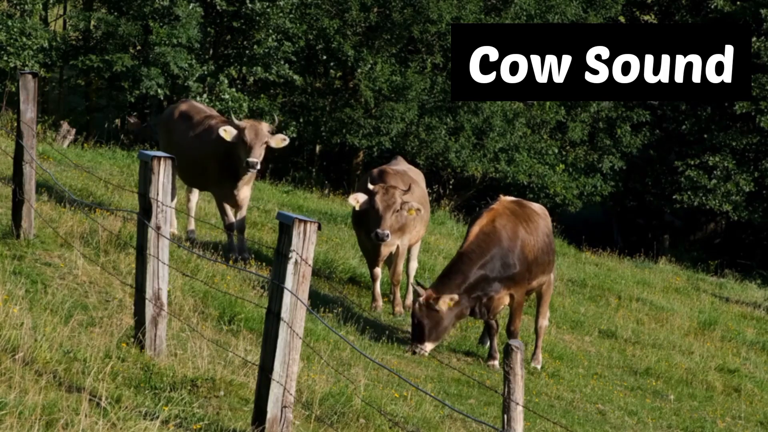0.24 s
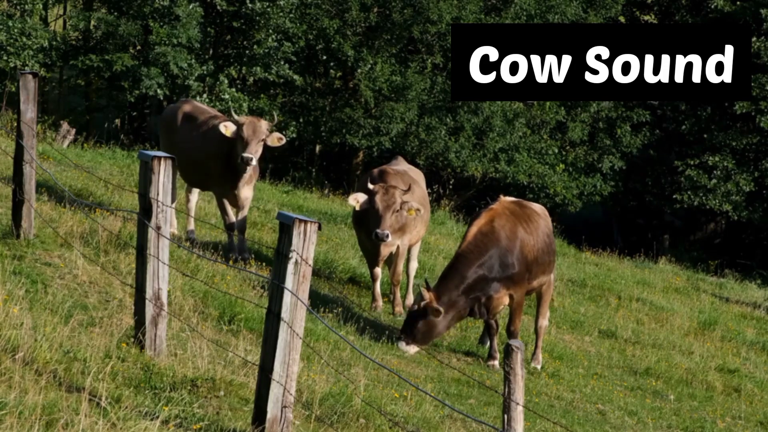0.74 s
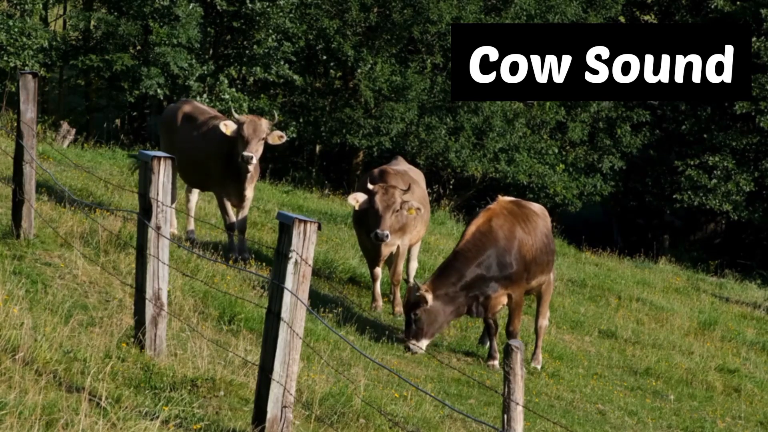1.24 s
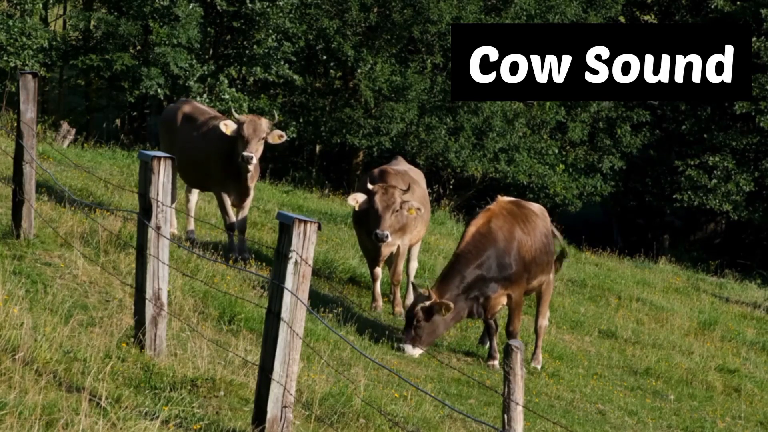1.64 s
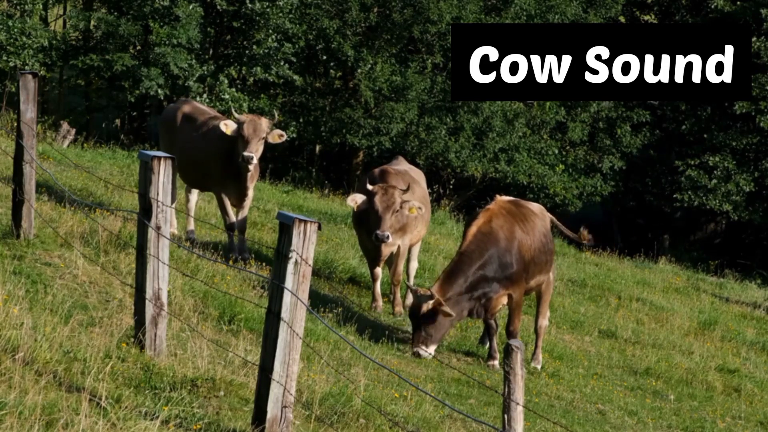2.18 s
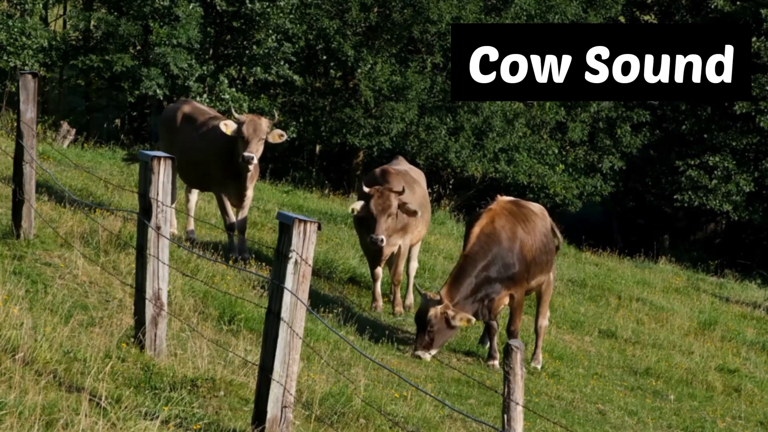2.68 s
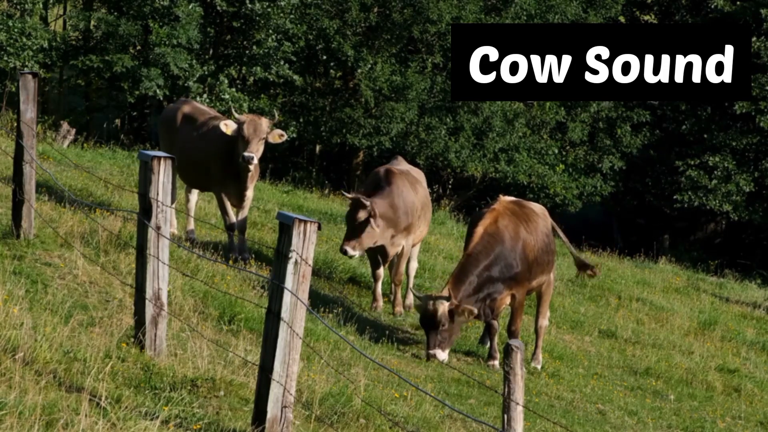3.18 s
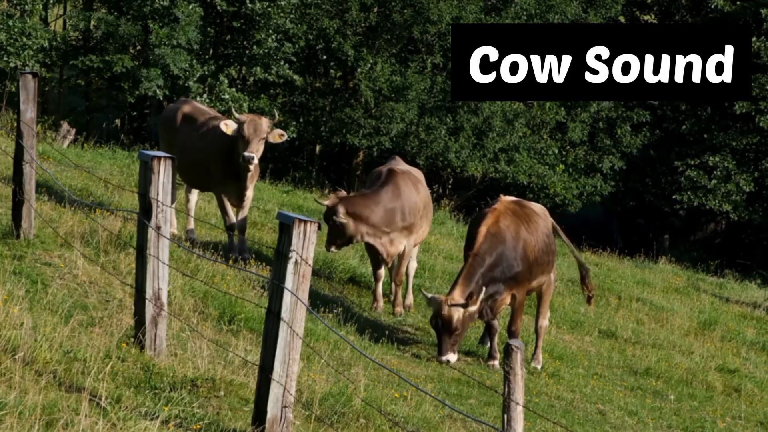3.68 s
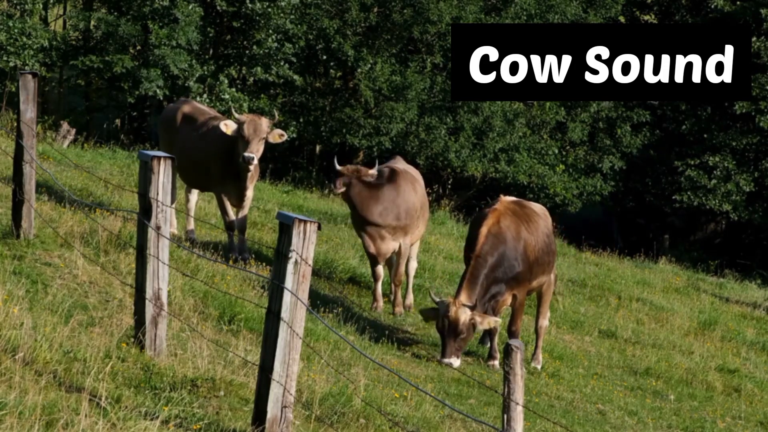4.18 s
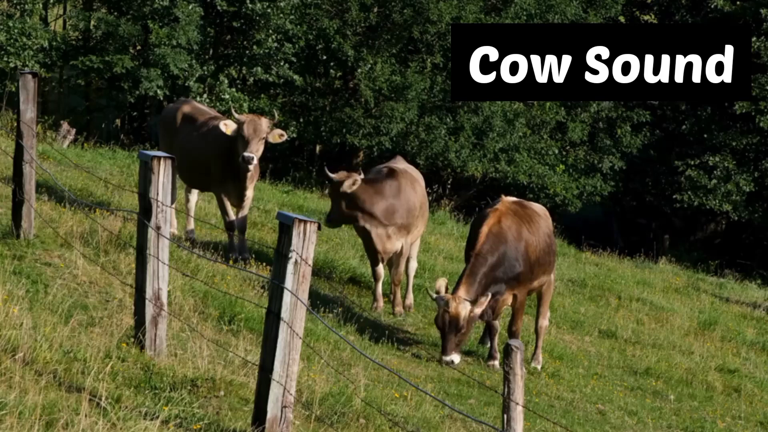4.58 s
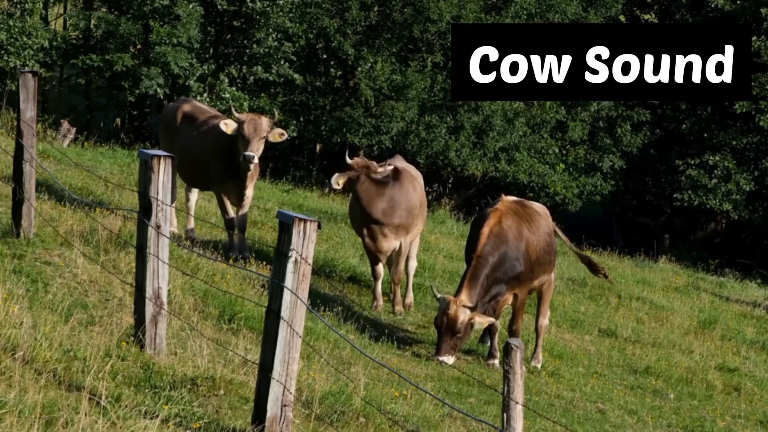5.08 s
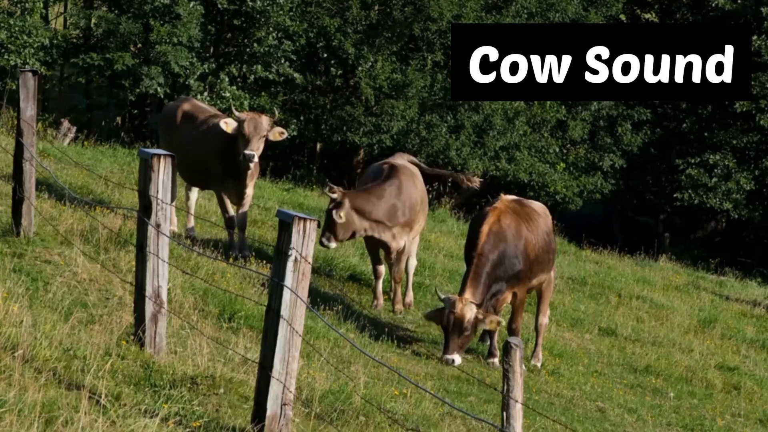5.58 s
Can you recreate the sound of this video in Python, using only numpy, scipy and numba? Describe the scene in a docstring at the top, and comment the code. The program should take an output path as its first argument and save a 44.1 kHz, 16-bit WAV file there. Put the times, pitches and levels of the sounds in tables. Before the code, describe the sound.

Small birds chirp in quiet open air, then a cow's low rattle climbs into a long, held moo.

```python
"""Cow mooing on a pasture

Small birds chirp over a rush of open air and soft rustles of grass; a wood echoes them.
A cow gives one long moo, a low rattle that climbs into a clear, held bellow: vocal fold pulses
ring the moving resonances of throat, mouth and head. All sound cuts out briefly as the moo
ends, then a faint falling tone follows far off."""
import sys
import numpy as np
from scipy import signal
from scipy.fft import rfft, irfft, next_fast_len
from scipy.io import wavfile
from scipy.ndimage import uniform_filter1d
from numba import njit

SR = 44100
rng = np.random.default_rng(int(sys.argv[2]) if len(sys.argv) > 2 else 0)


def unload_wav(signal):
    """Save mono or channel-first audio to the path in sys.argv[1] as 16-bit WAV at rate SR, clipped to [-1, 1]."""
    wavfile.write(
        sys.argv[1],
        SR,
        np.round(np.clip(np.atleast_2d(signal).T, -1, 1) * 32767).astype(np.int16),
    )


N = 257103
TIME = np.arange(N) / SR


def undb(db):
    """Decibels to gain."""
    return 10 ** (np.asarray(db) / 20)


def ramp(x, start, span):
    """0 before start, rising straight to 1 over span."""
    return np.clip((x - start) / span, 0, 1)


def curves(table):
    """Each value column of a table of (seconds, value, ..), one value per sample."""
    times_s, *columns = np.transpose(table)
    return [np.interp(TIME, times_s, column) for column in columns]


def delayed(x, seconds):
    """Delay by a fixed or moving time."""
    return np.interp(TIME - seconds, TIME, x, left=0)


def smooth(x, samples):
    """Moving average, applied twice."""
    return uniform_filter1d(uniform_filter1d(x, samples), samples)


def unit(x):
    """Scale to rms 1."""
    return x / np.sqrt(np.mean(x ** 2))


def steady(x):
    """Hold the short-term rms at 1."""
    return x / np.sqrt(np.abs(smooth(x ** 2, samples=1300)) + 1e-14)


def wander(rate_hz):
    """Smoothed random steps, spread near 1."""
    hold = int(SR / rate_hz)
    steps = np.repeat(rng.standard_normal(N // hold + 1), hold)
    return 1.43 * smooth(steps, hold)[:N]


def butter(x, hz, kind, order):
    """Butterworth low-pass or high-pass."""
    return signal.sosfilt(signal.butter(order, hz, kind, fs=SR, output="sos"), x)


@njit
def svf(x, hz, width_hz):
    """State-variable filter with a moving centre: band-pass and resonant low-pass outputs."""
    out = np.empty((2, len(x)))
    band_state, low_state = 0., 0.
    for i in range(len(x)):
        g, damping = np.tan(np.pi * hz[i] / SR), width_hz / hz[i]
        band = (band_state + g * (x[i] - low_state)) / (1 + g * (g + damping))
        out[0, i], out[1, i] = damping * band, low_state + g * band
        band_state, low_state = 2 * band - band_state, low_state + 2 * g * band
    return out


def resonance(x, hz, width_hz):
    """Band-pass with gain 1 at its centre."""
    return svf(x, hz * np.ones(N), float(width_hz))[0]


def steep_resonance(x, hz, width_hz, narrowing=1):
    """Two band-passes in series; narrowing scales the second width."""
    return resonance(resonance(x, hz, width_hz), hz, narrowing * width_hz)


def cavity(x, hz, width_hz):
    """Tube resonance: passes what lies below, damps what lies above."""
    return svf(x, hz * np.ones(N), float(width_hz))[1]


# Each row: frequency in Hz, relative noise density in dB.
AIR_SPECTRUM = [(24, -88), (40, -63.5), (105, -17.5), (156, -8.5), (193, -3.5), (372, -4), (428, 0),
                (530, -5), (578, -16), (630, -8), (718, -4), (788, -12.5), (1560, -18), (2210, -20),
                (2740, -25), (7330, -45.5), (10900, -45.5), (14200, -103.5), (22000, -120)]
# Each row: time in seconds, overall level in dB.
AIR_LEVEL = [(0, -37), (.4, -37.5), (1.05, -42), (1.25, -39.5), (2.2, -40.5), (3.2, -39.5), (5.83, -44)]
# Each row: time in seconds, midrange lift in dB, treble lift in dB.
LEAF_HISS = [(0, -3.5, 4.5), (.45, -3.5, 6.5), (.7, -3.5, 5), (1.3, 0.5, 11.5), (2.2, -0.5, 6),
             (2.8, -1.5, 15.5), (5.83, 5.5, 15)]


def air():
    """Outdoor rush in wavering third-octave bands; the leaf hiss comes and goes."""
    (level_db,), (mid_db, treble_db) = curves(AIR_LEVEL), curves(LEAF_HISS)
    points_hz, points_db = np.transpose(AIR_SPECTRUM)
    size = next_fast_len(N)
    octave = np.log2(np.maximum(np.arange(size // 2 + 1) * SR / size, 1))
    spectrum = rfft(rng.standard_normal(size)) * undb(np.interp(octave, np.log2(points_hz), points_db))
    rush = 0
    for centre in np.arange(13, 42) / 3:
        hz = 2 ** centre
        triangle = np.maximum(1 - 3 * np.abs(octave - centre), 0)
        band = irfft(spectrum * triangle, size)[:N]
        waver_db = 3.0 if hz < 900 else 3.2
        lift_db = treble_db if hz > 3500 else mid_db * (hz > 1200)
        rush = rush + band * undb(waver_db * wander(11) + lift_db)
    return unit(rush) * undb(level_db)


# Each row: start in seconds, length in seconds, centre in Hz, width in Hz, level in dB.
RUSTLES = [(-.25, .85, 5500, 1100, -57), (1.08, .17, 5400, 2000, -55), (1.5, .36, 2200, 800, -54),
           (1.535, .03, 2600, 1500, -47), (1.92, .04, 7000, 5000, -60), (2.103, .02, 720, 250, -40)]


def rustle(start_s, length_s, hz, width_hz, db):
    """Grass stirs: one swell of band noise."""
    band = steep_resonance(rng.standard_normal(N), hz, width_hz)
    return unit(band) * np.sin(np.pi * ramp(TIME, start_s, length_s)) * undb(db)


def whistle(start_s, length_s, contour, db, buzz_hz, overtone_db=-34):
    """A near-sine along a contour of (share of length, Hz); a fast trill swings it by buzz_hz."""
    progress = np.linspace(0, 1, int(length_s * SR))
    trill_hz = 245 * (1 + 0.383 * rng.uniform(-1, 1))
    trill = np.sin(2 * np.pi * (trill_hz * length_s * progress + rng.random()))
    hz = np.interp(progress, *np.transpose(contour)) + buzz_hz * trill
    phase = 2 * np.pi * np.cumsum(hz) / SR
    envelope = np.clip(np.minimum(progress / 0.095, (1 - progress) / 0.047), 0, 1)
    flutter = 1 + .55 * trill * buzz_hz / (buzz_hz + 100)
    note = (np.sin(phase) + undb(overtone_db) * np.sin(2 * phase)) * envelope * flutter
    first = int(start_s * SR)
    padded = np.pad(unit(note) * undb(db), (max(first, 0), N + abs(first)))
    return padded[max(-first, 0):][:N]


# Each row: start in seconds, level in dB, second syllable's relative level in dB.
CHIRRUPS = [(-.03, -41, -3), (1.267, -29, -2.5), (2.776, -27.5, -1.5)]
# Each row: share of the length, first syllable's pitch in Hz, second syllable's pitch in Hz.
SYLLABLE_PITCH = [(0, 3364, 3060), (0.141, 4323, 3947), (.27, 4297, 4220), (0.448, 4293, 4018),
                  (.57, 3790, 3658), (.68, 3748, 4176), (.84, 4007, 3300), (1, 3330, 3310)]
# Each row: delay in seconds, gain in dB.
WOOD_ECHOES = [(0.062, -10.5), (.118, -17.5), (.18, -18.5)]


def chirrup(start_s, db, accent_db, flick_s=0.025, step_s=.058, buzz_hz=174):
    """The near bird: an upward flick, two syllables from both sides of the syrinx, and echoes."""
    call = slur(start_s - flick_s, flick_s, hz=4800, glide_oct=0.3, arch_oct=0,
                buzz_hz=buzz_hz, db=db - 14)
    for ratio, side_db in (1, db), (0.93, db - 9.5):  # one side sings lower and softer
        arched = [(share, ratio * hz) for share, hz, _ in SYLLABLE_PITCH]
        tumbling = [(share, ratio * hz) for share, _, hz in SYLLABLE_PITCH]
        call = call + whistle(start_s, .054, arched, side_db, buzz_hz)
        call = call + whistle(start_s + step_s, .062, tumbling, side_db + accent_db, buzz_hz)
    return call + sum(undb(echo_db) * delayed(call, delay_s) for delay_s, echo_db in WOOD_ECHOES)


def wood_scatter(x, t60_s, wet_db, build_s):
    """The sound plus its scatter from trunks and leaves, which builds up and dies away."""
    t = TIME[:SR]
    tail = rng.standard_normal(SR) * undb(-60 * t / t60_s) * (1 - np.exp(-(t / build_s) ** 2))
    return x + undb(wet_db) * signal.fftconvolve(x, tail / np.linalg.norm(tail))[:N]


# Other birds. Each row: start in seconds, length in seconds, centre pitch in Hz, glide in octaves,
# arch in octaves, buzz depth in Hz, level in dB.
BIRD_SLURS = [(0.845, 0.052, 3770, .33, 0.015, 120, -58), (.919, 0.036, 4030, -0.18, 0.3, 110, -55.5),
              (1.575, 0.18, 7330, -0.054, 0.0027, 270, -57.5), (1.901, 0.05, 3530, -0.37, 0.12, 140, -56.5),
              (2.345, 0.066, 7260, -0.084, -0.12, 290, -57), (2.403, 0.083, 7250, -0.012, -0.023, 290, -53),
              (2.46, 0.051, 3600, 0.079, -0.29, 400, -49.5), (2.596, 0.037, 5580, 0.43, -0.13, 310, -43.5),
              (2.616, 0.028, 4200, 0.25, 0.27, 300, -47.5), (2.994, 0.064, 5620, -0.0079, 0.029, 20, -48.5),
              (3.116, 0.031, 4940, -0.71, 0.12, 100, -44), (3.146, 0.025, 6540, 0.39, -0.16, 210, -41),
              (3.159, 0.025, 4370, 0.66, 0.0089, 430, -41.5), (3.284, 0.025, 5780, 0.38, -0.037, 87, -34),
              (3.29, 0.016, 9100, .25, 0, 200, -48.5), (3.417, 0.1, 7330, 0.85, -0.047, 840, -48),
              (3.976, 0.04, 5200, -0.21, -0.049, 370, -46)]


def slur(start_s, length_s, hz, glide_oct, arch_oct, buzz_hz, db):
    """One note gliding through its centre pitch, bent into an arch or a dip."""
    position = np.linspace(-1, 1, num=9)
    pitch_hz = hz * 2 ** (glide_oct * position / 2 - arch_oct * position ** 2)
    contour = np.transpose([(position + 1) / 2, pitch_hz])
    return whistle(start_s, length_s, contour, db, buzz_hz)


# Each row: start in seconds, stop in seconds, notes per second, mean note level in dB.
TWITTERS = [(2.364, 2.516, 360, -60), (2.578, 2.699, 240, -62), (3.045, 3.073, 330, -56),
            (3.136, 3.177, 420, -49.5), (3.227, 3.304, 260, -56), (3.417, 3.553, 360, -49.5)]


def twitter(start_s, stop_s, notes_per_s, db, low_hz=3100, high_hz=8800):
    """Quick faint notes at random moments and pitches, each sweeping up or down."""
    span_s = stop_s - start_s
    notes = np.zeros(N)
    for when, height, sweep, strength in rng.random((int(notes_per_s * span_s), 4)):
        hz = low_hz * (high_hz / low_hz) ** height
        notes += slur(start_s + when * span_s, length_s=0.015, hz=hz, glide_oct=0.19 * (2 * sweep - 1),
                      arch_oct=0, buzz_hz=300, db=db + 5 * (2 * strength - 1))
    return notes


def vocal_folds(hz, rough, jitter=0.01338, waver=0.00197, shimmer_db=3.0, puff_cycles=0.55):
    """One sharp pulse per closure and a puff of turbulence after each."""
    uneven_hz = hz * (1 + jitter * rough * wander(110) + waver * wander(22))
    cycles = np.cumsum(uneven_hz) / SR
    offset = ((cycles + .5) % 1 - .5) * SR / hz  # samples from the nearest closure
    pulses = np.sinc(offset / 2) * np.exp(-(offset / 10) ** 2)
    puffs = rng.standard_normal(N) * np.exp(-(cycles % 1) / puff_cycles)
    return unit(pulses) * undb(-shimmer_db * rough * wander(110)), unit(puffs) * rough


# Each row: time in seconds, six resonance centres in Hz, brightness in dB.
MOUTH_SHAPE = [(3.38, 240, 700, 967, 1459, 1830, 1985, -5.2), (3.52, 257, 686, 944, 1480, 1910, 1955, -1),
               (3.61, 240, 700, 990, 1510, 1830, 1927, -4), (3.63, 238, 797, 987, 1350, 1770, 1980, -12),
               (3.72, 263, 801, 1058, 1500, 1850, 1980, -19.7),
               (3.8, 262, 827, 1024, 1510, 1856, 2010, -27), (3.9, 283, 775, 1060, 1520, 1726, 1951, -28),
               (4.0, 302, 760, 988, 1447, 1720, 1945, -11.5), (4.12, 325, 713, 1020, 1365, 1719, 1870, -11),
               (4.2, 345, 910, 975, 1486, 1710, 1930, -13.5), (4.3, 357, 793, 942, 1400, 1750, 1896, -4),
               (4.42, 380, 723, 984, 1420, 1540, 1920, -4.5), (4.66, 356, 730, 996, 1407, 1560, 1860, 1.0),
               (4.8, 370, 617, 1030, 1400, 1755, 1868, 10), (4.92, 390, 720, 985, 1500, 1757, 1893, -3),
               (5.04, 442, 801, 991, 1510, 1826, 1820, -17.5), (5.25, 482, 850, 960, 1574, 1820, 1904, -22),
               (5.5, 470, 744, 968, 1540, 1780, 1813, -14)]
# Width in Hz of each of the six resonances.
MOUTH_WIDTHS_HZ = [43, 172, 76, 129, 165, 66.5]
# Fixed hollows in the moo's tone, where ground and nearby reflections cancel it.
# Each row: centre in Hz, width in Hz, depth from 0 to 1.
NOTCHES = [(583, 35, 0.92), (1447, 29, 0.7)]
# Each row: delay in seconds, linear gain.
NEAR_REFLECTIONS = [(.00243, .3), (.00356, -.17), (.00426, -.2), (.00874, -.18), (.01038, -.1)]


def mouth_ring(source, crossover_hz=461):
    """Pulses, brighter with effort, ring the throat and the moving mouth; reflections colour them."""
    *centres_hz, bright_db = curves(MOUTH_SHAPE)
    low = high = source
    for _ in range(2):
        low = butter(low, crossover_hz, "low", order=1)
        high = butter(high, crossover_hz, "high", order=1)
    voice = cavity(low - undb(bright_db) * high, hz=2046, width_hz=200)  # throat
    for hz, width_hz in zip(centres_hz[::-1], MOUTH_WIDTHS_HZ[::-1]):  # moved by jaw and tongue
        voice = cavity(voice, hz, width_hz)
    voice = butter(voice, 212, "high", order=7)
    for hz, width_hz, depth in NOTCHES:
        voice = voice - depth * resonance(voice, hz, width_hz)
    return steady(voice + sum(gain * delayed(voice, delay_s) for delay_s, gain in NEAR_REFLECTIONS))


# Each row: time in seconds, then centres in Hz of the lowest, three rasp and top resonances.
HEAD_CENTRES = [(3.34, 2640, 2860, 3310, 3780, 4650), (3.47, 2600, 2920, 3680, 3830, 4640),
                (3.6, 2400, 2990, 3570, 3750, 4860), (3.7, 2400, 2830, 3270, 3810, 4600),
                (4.3, 2390, 3000, 3410, 3980, 4220), (4.75, 2290, 3070, 3750, 4000, 4390),
                (4.97, 2380, 3120, 3723, 3897, 4450), (5.2, 2300, 3120, 3788, 3946, 4630)]
# Each row: time in seconds, then levels in dB of the lowest resonance, the rasp and the top one.
HEAD_LEVELS = [(3.33, -46, -30, -52), (3.41, -43, -36, -41), (3.5, -36.5, -27, -39.5),
               (3.64, -37.5, -34, -40), (3.77, -34, -35.5, -51), (3.84, -35.5, -40.5, -54),
               (3.88, -53, -42.5, -57), (4.01, -43, -38.5, -44.5), (4.04, -44.5, -42, -52),
               (4.211, -45, -38, -41), (4.559, -43, -45, -44.5), (4.65, -39, -42.5, -42),
               (4.969, -37, -37.5, -40.5), (5.041, -40, -38.5, -48), (5.41, -41.5, -39, -51),
               (5.499, -39.5, -43.5, -45.5)]
# Each row: width in Hz, relative level in dB.
RASP_BANDS = [(168, -3.5), (165, -1), (173, -3)]
# Each row: time in seconds, centre in Hz, level in dB.
THIN_WHISTLE = [(3.32, 10350, -48), (3.37, 10300, -47), (3.41, 9700, -52), (3.5, 9650, -48),
                (3.56, 9600, -65), (3.64, 9000, -72)]


def head_ring(source):
    """Upper resonances slide as the neck stretches, with hiss and, early on, a thin sinking whistle."""
    lowest_hz, *rasp_hz, top_hz = curves(HEAD_CENTRES)
    lowest_db, rasp_db, top_db = curves(HEAD_LEVELS)
    thin_hz, thin_db = curves(THIN_WHISTLE)
    rasp = sum(undb(db + 2 * wander(14)) * steep_resonance(source, hz, width_hz, narrowing=0.95)
               for hz, (width_hz, db) in zip(rasp_hz, RASP_BANDS))
    lowest = steep_resonance(source, lowest_hz, width_hz=260, narrowing=0.95)
    top = steep_resonance(source, top_hz, width_hz=430, narrowing=0.95)
    hiss = butter(source, 4700, "high", order=3)
    thin = steep_resonance(source, thin_hz, width_hz=500)
    hiss_db = -36 + .5 * rasp_db
    parts = (lowest, lowest_db), (rasp, rasp_db), (top, top_db), (hiss, hiss_db), (thin, thin_db)
    return sum(undb(db) * steady(part) for part, db in parts)


# Each row: time in seconds, vocal fold rate in Hz.
MOO_PITCH = [(3.31, 60.4), (3.39, 70.27), (3.61, 98.5), (3.7, 108.7), (3.92, 128.1), (4.21, 154.1),
             (4.4, 165.6), (4.63, 162.8), (5.0, 169.9), (5.3, 173.4), (5.5, 168.4)]
# Each row: time in seconds, level of the full voice in dB.
BELLOW_LEVEL = [(3.62, -14), (3.73, -13.5), (3.93, -12.5), (4.15, -14), (4.21, -12), (4.45, -12.5),
                (4.66, -12.1), (4.72, -13), (4.88, -13.5), (5.11, -12), (5.5, -14)]


def cow(start_s=3.286, break_s=3.619, flap_s=.0052, slap_s=.0027):
    """The moo swells as a rough rattle, breaks into full voice and clears near its held pitch."""
    (hz,), (bellow_db,) = curves(MOO_PITCH), curves(BELLOW_LEVEL)
    swell = ramp(TIME, start_s, 0.24)
    voiced = ramp(TIME, break_s, 0.011)
    held = ramp(hz, 140, 32)
    rattle_db = -35 + 17 * swell
    overshoot_db = 4.5 * (1 - ramp(TIME, break_s, 0.075))
    level_db = (1 - voiced) * rattle_db + voiced * (bellow_db + overshoot_db)
    rough = (1 - voiced) * 0.444 + voiced * (0.22 - 0.1 * held)
    pulses, puffs = vocal_folds(hz, rough)
    # The fundamental sounds once it climbs into the chest resonance.
    chest = steady(steep_resonance(pulses, hz=150, width_hz=40)) * ramp(hz, 130, 14)
    rumble = unit(resonance(puffs * rough, hz=92, width_hz=55))
    # In the rattle, the slack folds flap once more between closures.
    flap = (1 - voiced) * swell * delayed(pulses, flap_s * (1 + 0.223 * wander(60)))
    turbulence = butter(puffs, 1000, "high", order=2) + butter(flap, 1080, "high", order=5)
    lower = mouth_ring(pulses + turbulence) + undb(-46) * chest
    # Until the pitch is held, an uneven slap follows each closure.
    slap = (1 - held) * delayed(pulses, slap_s * (1 + 0.186 * wander(10)))
    closure_strength = undb(4 * rough * wander(90))
    upper = head_ring((pulses + slap + (2 - 1.2 * voiced) * puffs) * closure_strength)
    return (lower * undb(level_db) + upper + undb(-59) * rumble) * ramp(TIME, start_s, 0.054)


def far_tone():
    """A faint falling tone, scattered by the wood."""
    tone = slur(start_s=5.6, length_s=.14, hz=480, glide_oct=-.26, arch_oct=.03, buzz_hz=22, db=-41)
    return wood_scatter(tone, t60_s=0.6, wet_db=-4, build_s=0.01)


def scene(cut_s=5.515, resume_s=5.571):
    """Air, grass, birds and cow, nearly centred; a brief dropout ends the moo."""
    before_cut = np.clip((cut_s - TIME) / 0.0071, 0, 1)
    gate = before_cut + ramp(TIME, resume_s, 0.0025)
    moo = wood_scatter(cow(), t60_s=.3, wet_db=-15, build_s=.008)
    notes = sum(chirrup(*row) for row in CHIRRUPS)
    notes += sum(slur(*row) for row in BIRD_SLURS)
    notes += sum(twitter(*row) for row in TWITTERS)
    flicker = undb(2.1 * wander(160))
    birds = wood_scatter(notes * flicker, t60_s=0.5, wet_db=-7.5, build_s=0.008)
    far = far_tone()
    grass = sum(rustle(*row) for row in RUSTLES)
    mid = moo * before_cut + (birds + far + grass + air()) * gate
    width = undb(-24.5) * butter(np.roll(mid, shift=300), 820, "high", order=2)
    side_hiss = undb(-71) * butter(rng.standard_normal(N), 7500, "high", order=3)
    side = (width + side_hiss) * gate
    return np.array([mid + side, mid - side])


def record(dry, ceiling=0.69, top_hz=11100):
    """Round the highest peaks and cut the top octave."""
    rounded = dry / (1 + (dry / ceiling) ** 8) ** (1 / 8)
    return signal.sosfilt(signal.ellip(10, .2, 70, top_hz, fs=SR, output="sos"), rounded)


dry = scene()
out = record(dry)
unload_wav(out)
```